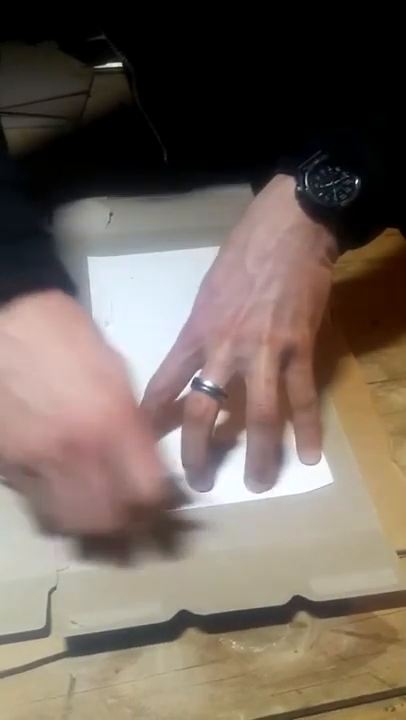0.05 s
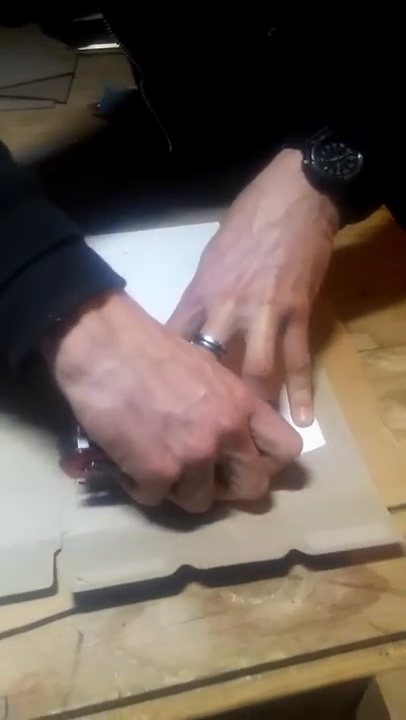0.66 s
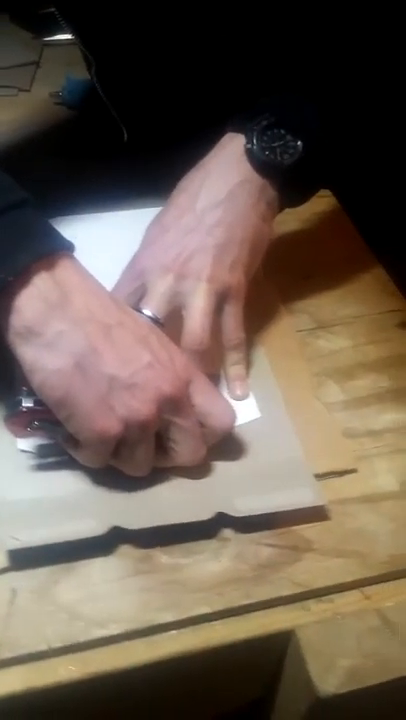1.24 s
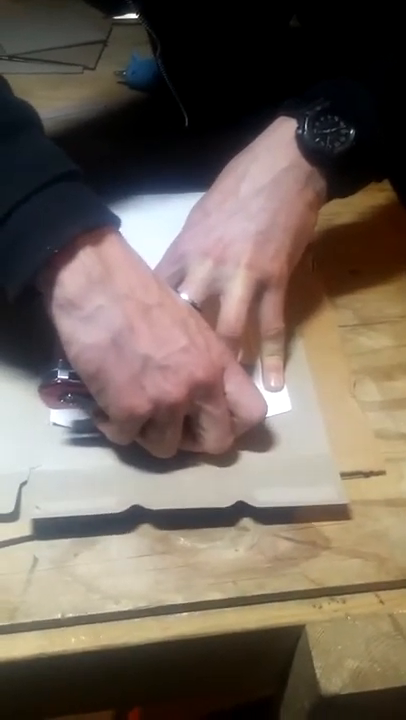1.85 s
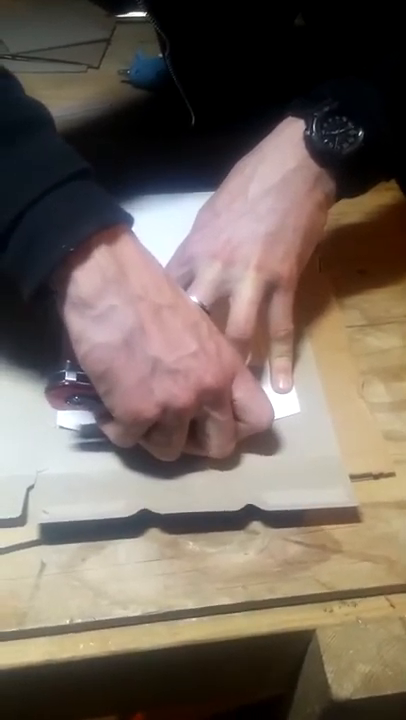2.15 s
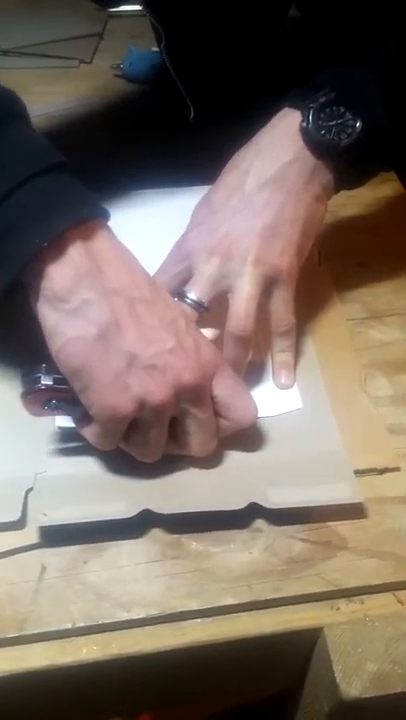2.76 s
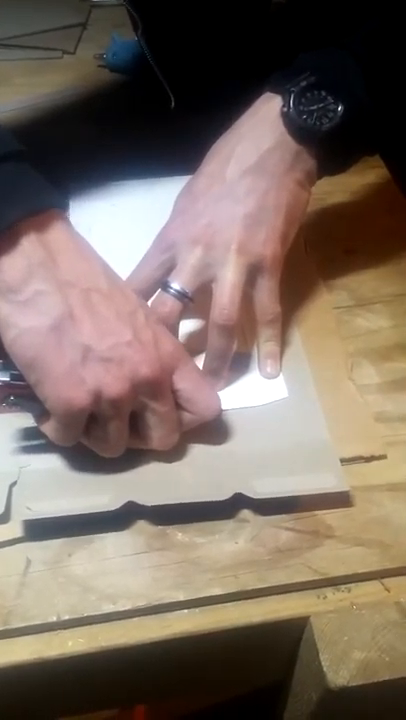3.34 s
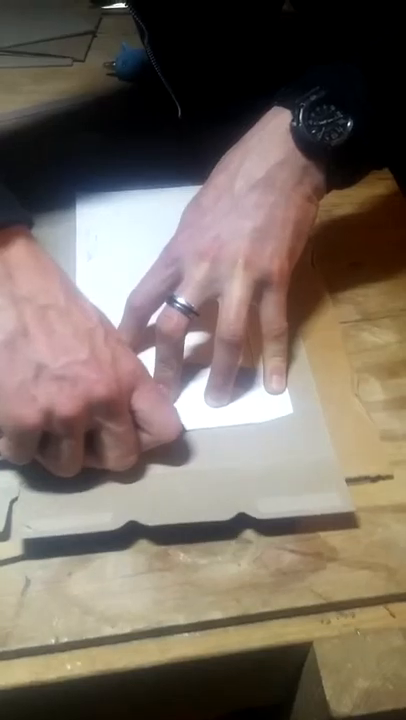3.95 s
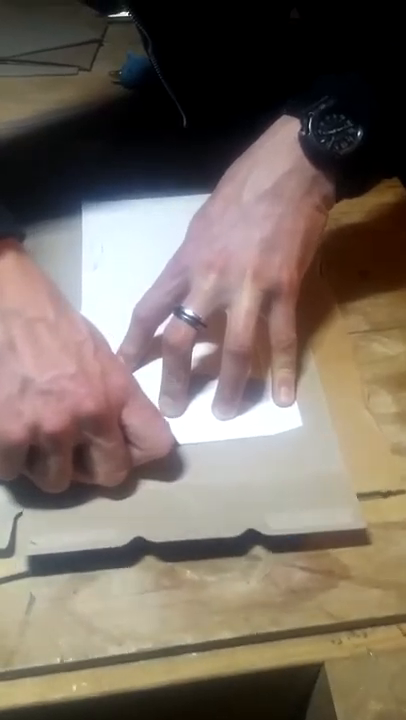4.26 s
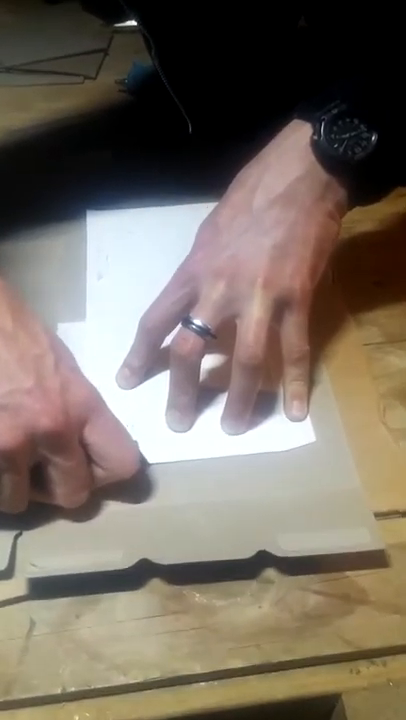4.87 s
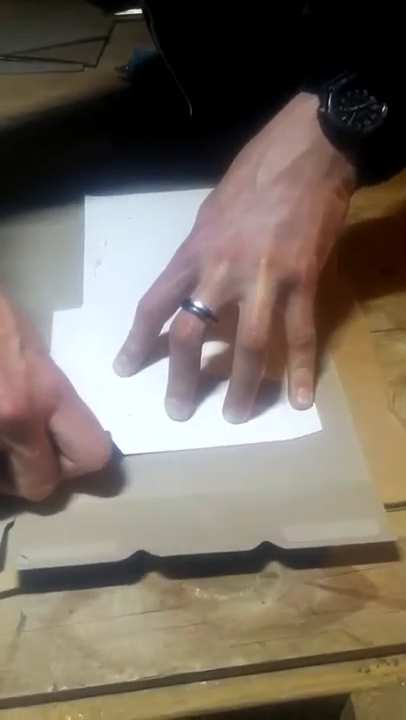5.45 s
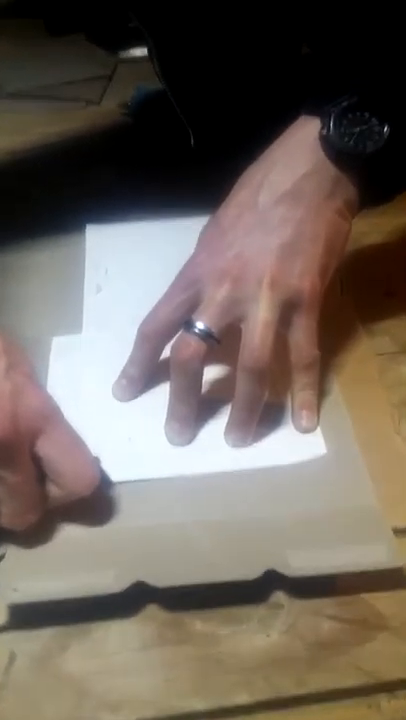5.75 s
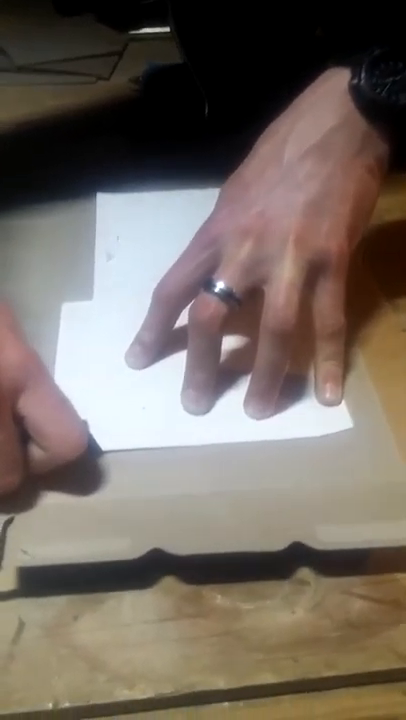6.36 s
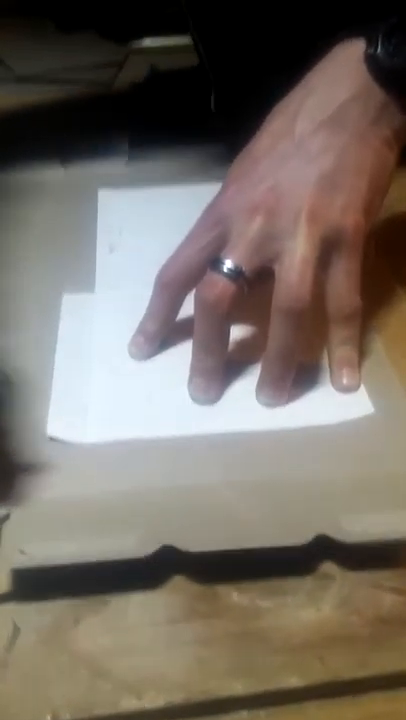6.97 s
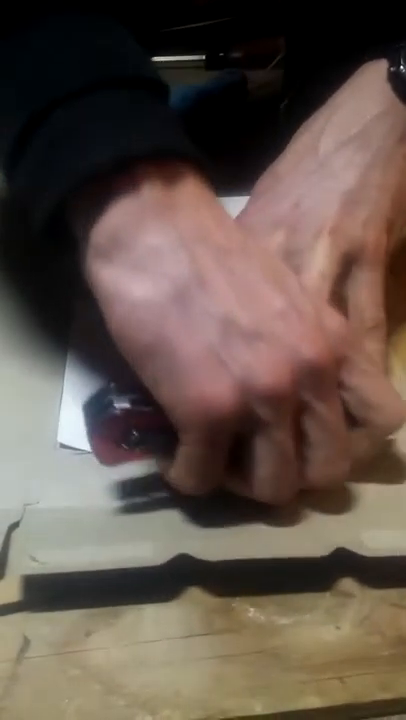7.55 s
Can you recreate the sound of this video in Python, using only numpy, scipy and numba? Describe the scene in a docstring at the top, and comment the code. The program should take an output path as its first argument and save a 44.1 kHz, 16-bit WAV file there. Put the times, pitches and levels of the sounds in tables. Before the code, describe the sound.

Close to a phone microphone in a small, quiet room, hands tap lightly and slide paper across a wooden bench. After a short lull, a knife blade rasps through paper and thin cardboard, starting faintly and growing in irregular strokes with tiny ticks and a low rumble. It ends with a quick rip, two loud bursts of sharp clicks and wooden knocks, and a soft brush of hand and sleeve.

```python
"""A pocket knife cuts paper and thin cardboard on a wooden workbench, close to a phone in a small room.
The sheet hisses as it is slid into place, then fibres snap under the blade in uneven pushes
while the dragging makes the bench rumble. The blade rips out through the edge, the knife clatters
against the bench, and hand and sleeve brush the board.
Deep handling rumble from the phone and faint room noise lie underneath."""
import sys
import numpy as np
from scipy import signal
from scipy.fft import rfft, irfft, next_fast_len
from scipy.io import wavfile
from numba import njit

SR = 44100
rng = np.random.default_rng(int(sys.argv[2]) if len(sys.argv) > 2 else 0)


def pcm_store(signal):
    """Save signal as 16-bit PCM."""
    levels = np.round(np.clip(np.atleast_2d(signal), -1, 1) * 32767)
    wavfile.write(sys.argv[1], SR, levels.astype(np.int16).T)


N = 335601
T = np.arange(N) / SR

# how the moving hand shapes the cutting sound: (time [s], pitch of the resonances [ratio],
# hollow under the hand [dB], left microphone [dB], ring of the board [dB], highest treble [dB])
HAND_PATH = [(0, 1.0, -7, -4, 3, -5), (2.6, 1.206, -0.5, 0.5, 8.5, -6.5), (3.6, 1.194, -5, -1.5, -5, -2.5),
             (4.4, 1.08, 4.5, -0.5, -4.5, 1.5), (5.0, 1.067, 4, -1.5, -6.5, 4),
             (5.6, 1.012, 4, -1.5, -12.5, -1.5), (6.4, 0.98, 4, -1, -4.5, -4.5),
             (6.75, 0.99, 0, -1, -10.5, 0), (7.1, 0.95, -14.5, 4, -5, -7.5)]
# blows on the bench: (time [s], relative level [dB], contact time [s])
BENCH_BLOWS = [(.091, -33, 0.0068), (.111, -42, 0.003), (0.361, -42, 0.0074), (.535, -52, 0.0013),
               (0.601, -45.5, 0.0021), (0.617, -41.5, 0.0029), (.634, -45.5, 0.0021), (1.083, -48, 0.0028),
               (1.248, -54, 0.0011), (2.261, -54.5, 0.0015), (6.739, -18, 0.0014), (6.748, -23, 0.006),
               (6.765, -32.5, 0.0034), (6.826, -44, 0.0018), (6.853, -44.5, 0.0016), (6.945, -32, 0.0012),
               (6.9594, -20.5, 0.0013), (7.126, -42.5, 0.00032), (7.56, -49, 0.005)]


def cutting(effort):
    """The blade sticks and slips through fibres; the board and the hollow under the hand ring along."""
    # tone of the snapping fibres: (frequency [Hz], gain [dB])
    fibre_tone = [(200, -43.5), (450, -11), (800, -5.5), (1300, -13.5), (2000, -2), (3200, 1), (4500, 0),
                  (6000, -4), (8500, -2.5), (10200, -4.5), (12300, -4.5), (15500, -1.5)]
    # resonances of the board under the blade: (frequency before the hand's ratio [Hz], width [Hz], gain [dB])
    board_modes = [(2010, 340, 0.5), (3730, 360, -7.5)]
    # resonances of the hollow between hand and board, same columns
    hollow_modes = [(2080, 300, -2.5), (5210, 510, 3), (6390, 810, 3.5), (7430, 980, 7)]
    pitch, hollow_db, left_db, board_db, top_db = (curve(HAND_PATH, column=k) for k in range(1, 6))
    slips_db = 0.71 * flutter(45) + 1.5 * flutter(260)
    fibres = unit(grains(rate=3000, spread_db=3.5, hiss=1.0) * undb(slips_db)) * effort
    # the highest treble brightens towards the middle of the cut, then dulls
    fibres = fibres + (undb(top_db) - 1) * pass_band(fibres, 10500, "high")
    left, right = microphones(fibres, fibre_tone, echo_db=-1, blur_db=2, left_db=0, blur_s=0.0006)

    def ring(x, modes):
        """Resonances that fall in pitch as the hand moves along the cut."""
        return sum(undb(db) * resonate(x, hz * pitch, float(width)) for hz, width, db in modes)

    left = undb(left_db) * (left + undb(board_db) * ring(left, board_modes))
    # the hollow opens towards the right microphone only
    right = right + undb(board_db) * ring(right, board_modes) + undb(hollow_db) * ring(right, hollow_modes)
    return undb(5) * np.array([left, right])


def blade_effort():
    """How hard the blade works: separate pushes over a slow creep."""
    # pushes, the hardest ripping out through the edge: (time [s], length [s], relative level [dB])
    pushes = [(2.69, 0.02, -55), (2.826, 0.036, -53.5), (2.995, .045, -58), (3.05, 0.091, -55),
              (3.205, 0.11, -58.5), (3.385, 0.049, -57.5), (3.48, 0.049, -58), (3.558, .11, -49),
              (3.875, .16, -46), (3.955, 0.013, -42.5), (4.158, .045, -51.5), (4.212, .018, -45.5),
              (4.265, .125, -53), (4.425, 0.054, -45.5), (4.51, 0.12, -56), (4.58, 0.03, -42.5),
              (4.675, 0.057, -50.5), (4.76, 0.04, -39), (4.81, 0.052, -42), (4.947, 0.074, -52.5),
              (5.055, 0.068, -54.5), (5.215, 0.066, -52.5), (5.33, 0.033, -48), (5.476, 0.021, -53),
              (5.52, 0.069, -47.5), (5.69, .125, -55.5), (5.89, 0.053, -53), (5.955, 0.13, -49.5),
              (6.178, .045, -59), (6.298, 0.047, -50.5), (6.368, 0.072, -56), (6.45, 0.043, -51.5),
              (6.588, .03, -35), (6.737, 0.0092, -24.5), (6.752, 0.021, -30), (6.952, 0.0035, -27)]
    # the blade creeping on between pushes: (time [s], relative level [dB])
    creep = [(2.51, -76), (2.75, -66), (2.93, -67.5), (3.5, -64.5), (3.83, -56), (4.1, -64), (4.55, -56.5),
             (4.9, -63), (5.2, -56.5), (5.43, -64.5), (5.65, -58.5), (6.15, -67.5), (6.52, -63), (6.8, -55),
             (7.1, -58)]
    outside_s = np.maximum(creep[0][0] - T, 0) + np.maximum(T - creep[-1][0], 0)
    creeping = undb(curve(creep)) * np.exp(-outside_s / 0.014)
    return np.hypot(strokes(pushes, rise_s=0.013, fall_s=0.013, arch_db=1.5), creeping)


def clicking():
    """Each click of the knife is a sharp crack with a short crunch and its own brightness."""
    # clicks of blade and handle: (time [s], relative level [dB], fade time [s], treble cutoff [Hz])
    clicks = [(.087, -42.5, 0.0036, 12000), (0.391, -35, 0.0028, 1900), (.476, -41.5, 0.0022, 2200),
              (3.18, -41.5, 0.0024, 14000), (3.38, -43, .002, 14000), (3.42, -47, .003, 14000),
              (4.152, -50, .002, 14000), (5.471, -37.5, 0.0013, 14000), (6.171, -41, 0.0015, 14000),
              (6.232, -42, 0.00092, 14000), (6.737, -4, 0.0023, 14000), (6.741, -9, 0.0029, 14000),
              (6.9234, -9.5, 0.00036, 7070), (6.925, -7, 0.002, 7600), (6.9295, -4, 0.0013, 10000),
              (6.9432, -19, .002, 6900), (6.946, -11, 0.003, 13000), (6.954, -14, 0.0059, 3450),
              (6.96, -15, 0.00065, 10000), (6.9947, -9.5, 0.0037, 2720), (7.045, -15.5, 0.0016, 2400),
              (7.494, -33, 0.0029, 3000), (7.59, -25.5, 0.0046, 5050)]
    # ring of the blade against the board: (frequency [Hz], gain [dB])
    blade_tone = [(200, -20.5), (600, -15.5), (1050, -12), (1600, -3.5), (2200, -1.5), (3100, -4.5),
                  (4600, -4.5), (6100, 2), (7200, 0), (8500, -10.5), (10200, -3), (12500, -7.5),
                  (15000, -4.5)]
    out, t = np.zeros(N), T[:SR // 20]
    for start, db, fade_s, cutoff_hz in clicks:
        crunch = rng.standard_normal(len(t)) * np.exp(-t / fade_s)
        crunch *= 1.75 / np.linalg.norm(crunch)
        crunch[0] += 0.4  # the crack
        add(out, start, undb(db + 14) * pass_band(crunch, cutoff_hz, "low"))
    return microphones(out, blade_tone, echo_db=-9.5, blur_db=-14, left_db=-7, blur_s=0.005)


def knocking():
    """Short blows make the bench ring; each lands on a slightly different spot."""
    # the bench's own notes: (frequency [Hz], relative level [dB], time to fade by 60 dB [s])
    bench_modes = [(62, -14, 0.37), (85.3, -12, 0.47), (147, -7, 0.29), (167, -5, 0.23), (199.6, 2, 0.085),
                   (290, -4.5, 0.13), (351, -4, 0.096), (416, -7, 0.043), (519, -9.5, 0.066),
                   (656, -8, 0.088), (767, 3, 0.053)]
    hz, mode_db, t60 = np.transpose(bench_modes)[:, :, None]
    signs = (-1) ** np.arange(len(bench_modes))[:, None]
    out, t = np.zeros(N), T[:SR // 2]
    for start, db, contact_s in BENCH_BLOWS:
        spot = rng.standard_normal((len(bench_modes), 2))
        spot_hz = hz * (1 + 0.023 * spot[:, :1])
        spot_gain = signs * undb(mode_db + 4.2 * spot[:, 1:])
        notes = spot_gain * np.sin(2 * np.pi * spot_hz * t) * np.exp(-np.log(1000) * t / t60)
        push = np.sin(np.pi * t[t < contact_s] / contact_s)
        add(out, start, undb(db - 7.5) * signal.fftconvolve(notes.sum(axis=0), push / push.sum()))
    return out


def hand_moves():
    """Speed and weight of the hands as they slide and smooth the sheet."""
    # moves: (time [s], length [s], relative hiss level [dB], relative rumble level [dB])
    moves = [(.005, 0.018, -68, -84), (.045, 0.024, -86, -64.5), (.098, 0.011, -59, -63),
             (.13, .16, -73.5, -68.5), (.36, 0.015, -68.5, -86), (.43, 0.16, -72.5, -69.5),
             (.6, 0.13, -72, -63.5), (.995, 0.017, -44.5, -81), (1.035, 0.043, -50, -65),
             (1.09, 0.15, -58.5, -62.5), (1.265, .07, -86, -63.5), (1.35, 0.097, -76, -78),
             (1.695, 0.043, -63, -90), (1.8, .3, -98, -83), (2.29, 0.047, -82, -75), (2.41, 0.12, -91, -76),
             (7.14, 0.16, -76.5, -84), (7.49, 0.14, -74.5, -64.5)]
    return [strokes(moves, rise_s=0.021, fall_s=0.033, arch_db=1, column=k) for k in (2, 3)]


def sliding(speed):
    """The sheet hisses as it is turned and pressed flat."""
    # tone of sliding paper: (frequency [Hz], gain [dB])
    paper_tone = [(200, -10), (450, -15), (1000, -13.5), (2100, 0), (3400, -2.5), (4500, -6), (5800, -4.5),
                  (8000, 4.5), (10300, -1), (13000, -10), (15500, -4)]
    hiss = unit(grains(rate=2500, spread_db=0, hiss=0.99) * undb(2.26 * flutter(60.54))) * speed
    return undb(7.5) * microphones(hiss, paper_tone, echo_db=3, blur_db=6, left_db=-2, blur_s=0.00074)


def brushing():
    """Hand and sleeve brush the board: short swells of hollow noise."""
    # brushes: (time of peak [s], relative level [dB], rise and fall time [s], pitch [Hz], width [Hz])
    brushes = [(1.002, -54, 0.03, 1840, 940), (1.14, -64, 0.034, 2150, 600),
               (1.19, -66.5, 0.081, 4200, 1000), (1.714, -72.5, 0.045, 600, 400),
               (7.01, -53, .03, 2190, 700), (7.085, -57.5, 0.038, 7440, 2220),
               (7.124, -57.5, 0.035, 1160, 280), (7.231, -72.5, 0.053, 882, 499)]
    out = np.zeros((2, N))
    for peak_s, db, swell_s, hz, width in brushes:
        centre = np.full(N, float(hz))
        rub = rng.standard_normal((2, N))
        for _ in range(2):  # filtering twice makes the band steeper
            rub = np.array([resonate(side, centre, float(width)) for side in rub])
        out += undb(db) * unit(rub) * np.exp(-((T - peak_s) / swell_s) ** 2)
    return out * undb([[-0.5], [3]])


def blade_drag(effort):
    """The blade's pull on the bench follows its effort late, less than in proportion, and fades."""
    lag_s, fade_db_per_s, mid_cut_s = 0.019, 1.14, 4.5
    late_effort = np.interp(T - lag_s, T, effort)
    level_db = -58.5 - fade_db_per_s * (T - mid_cut_s)
    return undb(level_db) * (late_effort / undb(-50)) ** 0.79


def rumbling(drag, weight):
    """Uneven drag of blade and hands shakes the bench top."""
    # tone of the shaking bench: (frequency [Hz], gain [dB])
    rumble_tone = [(30, -31), (60, -17.5), (85, -8.5), (120, -11), (160, -1), (195, -3), (240, 2.5),
                   (285, -6), (380, -17.5), (520, -17), (900, -26), (3000, -66)]
    shake = unit(colour(grains(rate=580, spread_db=1, hiss=0.5), rumble_tone))
    return shake * (drag + undb(-6) * weight)


def handling_rumble(drag, weight):
    """Deep handling rumble of the phone that swells with pushes, hand moves and knocks."""
    fade_s, blade_db, hand_db, blow_db = 0.028, -7, -8, -22.5
    # tone of the handling rumble: (frequency [Hz], gain [dB])
    handling_tone = [(25, -29.5), (45, -6), (62, -3.5), (86, 1), (110, -11), (200, -37)]
    carry = np.exp(-2 / (fade_s * SR))
    power = (1 - carry) * ((undb(blade_db) * drag) ** 2 + (undb(hand_db) * weight) ** 2)
    for start, db, _ in BENCH_BLOWS:
        add(power, start, [undb(db + blow_db) ** 2])
    loudness = np.sqrt(signal.lfilter([1], [1, -carry], power + 1e-18))
    deep = colour(rng.standard_normal((3, N)), handling_tone)  # left, right, shared
    return loudness * (unit(deep[2]) + 0.28 * unit(deep[:2]))


def close_echoes(x, first_s, count=7):
    """Ever later echoes off hands and bench; their paths lengthen along the cut, so the tone drifts down."""
    stretch, index, out = 1 / curve(HAND_PATH), np.arange(N), 0
    for k in range(count):
        lag = first_s * np.sqrt(2.2) ** k * stretch * SR
        out = out + (-1) ** k * np.interp(index - lag, index, x)
    return out / np.sqrt(count)


def microphones(x, tone, echo_db, blur_db, left_db, blur_s):
    """Sound from the right with close echoes and a noisy blur; the left side hears it later and duller."""
    # shading at the left microphone: (frequency [Hz], gain [dB])
    left_shade = [(300, -7), (700, 3), (1300, 3.5), (2400, 0.5), (3500, -2), (4800, -5.5), (7500, -7),
                  (10000, -4), (12300, 1), (15000, -6)]
    carry = np.exp(-1 / (blur_s * SR))
    loudness = np.sqrt(signal.lfilter([1 - carry], [1, -carry], x ** 2 + 1e-18))
    blur = loudness * rng.standard_normal((2, N))
    direct = np.array([np.roll(x, 6), x])  # left is 6 samples late
    echoes = np.array([close_echoes(x, first_s=0.00135), close_echoes(x, first_s=0.00112)])
    both = direct + undb(echo_db) * echoes + undb(blur_db) * blur
    both /= np.sqrt(1 + undb(echo_db) ** 2 + undb(blur_db) ** 2)
    left, right = colour(both, tone)
    return np.array([undb(left_db) * colour(left, left_shade), right])


def room_echo(x, t60, delay_s):
    """A wash of reflections, different on each side, that fades by 60 dB in t60 seconds."""
    t = T[:SR]
    tail = rng.standard_normal((2, SR)) * np.exp(-np.log(1000) * t / t60) * (t > delay_s)
    tail /= np.linalg.norm(tail, axis=1, keepdims=True)
    return signal.fftconvolve(np.atleast_2d(x), tail, axes=1)[:, :N]


def room_noise():
    """Faint steady noise: the bass is mostly shared by both sides, the hiss is not."""
    # tone of the room noise: (frequency [Hz], gain [dB])
    air_tone = [(20, -27), (40, -17.5), (60, 0.5), (85, -5.5), (115, -12.5), (160, -10), (250, -20.5),
                (500, -15), (1200, -21), (2200, -22), (5000, -27.5), (9000, -27.5), (15500, -29.5)]
    noise = unit(colour(rng.standard_normal((3, N)), air_tone))  # left, right, shared
    bass, treble = pass_band(noise, 350, "low"), pass_band(noise, 350, "high")
    return undb(-75) * (1.66 * bass[2] + 0.52 * bass[:2] + 1.2 * treble[:2])


def grains(rate, spread_db, hiss):
    """Tiny random snaps, about `rate` a second, over smooth rubbing noise."""
    sizes = undb(spread_db * np.minimum(rng.exponential(size=N), 4.5))
    snaps = (rng.random(N) < rate / SR) * sizes * rng.choice([-1, 1], N)
    return unit(unit(snaps) + hiss * rng.standard_normal(N))


def strokes(rows, rise_s, fall_s, arch_db, column=2):
    """Loudness of hand strokes: each rises, holds in a shallow arch and dies away."""
    power = np.zeros(N)
    for row in rows:
        start, length = row[:2]
        near = slice(max(int((start - 0.2) * SR), 0), int((start + length + 0.3) * SR))
        t = T[near] - start
        arch = (2 * np.clip(t / length, 0, 1) - 1) ** 2
        edges = np.exp(np.minimum(t, 0) / rise_s - np.maximum(t - length, 0) / fall_s)
        power[near] += (undb(row[column] - arch_db * arch) * edges) ** 2
    return np.sqrt(power)


def flutter(rate):
    """Random wander with a spread near 1, taking `rate` steps a second."""
    steps = rng.standard_normal(N // 10)
    return 1.2 * np.interp(T * rate, np.arange(len(steps)), steps)


def colour(x, tone):
    """Filter a sound to follow a (frequency [Hz], gain [dB]) table."""
    size = 2 * next_fast_len(N // 2 + SR // 10)
    hz, db = np.transpose(tone)
    log_hz = np.log(np.maximum(np.fft.rfftfreq(size, 1 / SR), 1))
    gain = undb(np.interp(log_hz, np.log(hz), db))
    # this fold makes the filter ring only after a sound, never before it
    cepstrum = irfft(np.log(gain))
    cepstrum[1:size // 2] *= 2
    cepstrum[size // 2 + 1:] = 0
    return irfft(rfft(x, size) * np.exp(rfft(cepstrum)))[..., :N]


@njit
def resonate(x, hz, width):
    """Let through a band around a moving pitch, with gain 1 at its peak."""
    out, band_state, low_state = np.empty(len(x)), 0., 0.
    for i in range(len(x)):
        tuning, damping = np.tan(np.pi * hz[i] / SR), width / hz[i]
        band = (band_state + tuning * (x[i] - low_state)) / (1 + tuning * (tuning + damping))
        band_state = 2 * band - band_state
        low_state += 2 * tuning * band
        out[i] = damping * band
    return out


def pass_band(x, hz, side):
    """Keep the "low" or "high" side of a frequency, with a gentle slope."""
    return signal.sosfilt(signal.butter(2, hz, side, fs=SR, output="sos"), x)


def undb(db):
    """Turn decibels into a gain."""
    return 10 ** (np.asarray(db) / 20)


def unit(x):
    """Scale to an average power of 1."""
    return x / np.sqrt(np.mean(x ** 2))


def curve(rows, column=1):
    """One column of a table, joined by straight lines in time."""
    rows = np.array(rows)
    return np.interp(T, rows[:, 0], rows[:, column])


def add(track, start_s, sound):
    """Mix a short sound into a track."""
    start = min(int(start_s * SR), N - 1)
    track[start:start + len(sound)] += sound[:N - start]


def scene():
    """Everything on the bench, with the short ring of the room."""
    # tone of the wall echoes: (frequency [Hz], gain [dB])
    wall_tone = [(300, 3), (800, 6.5), (1230, 14), (1700, 3), (5000, -6), (15000, -16)]
    effort = blade_effort()
    drag = blade_drag(effort)
    speed, weight = hand_moves()
    near = cutting(effort) + sliding(speed) + brushing() + clicking()
    bench = (rumbling(drag, weight) + knocking()) * undb([[-1], [0.8]])
    walls = undb(-12.5) * colour(room_echo(near.mean(axis=0), t60=0.36, delay_s=0.0073), wall_tone)
    boom = undb(-9.5) * room_echo(bench.mean(axis=0), t60=0.48, delay_s=0.003)
    return near + bench + walls + boom + handling_rumble(drag, weight) + room_noise()


def record(dry):
    """The phone cuts the deepest bass and the highest treble."""
    treble_cut = signal.ellip(10, 0.2, 80, 15950, fs=SR, output="sos")
    return signal.sosfilt(treble_cut, pass_band(dry, 38, "high"))


dry = scene()
out = record(dry)
pcm_store(out)
```